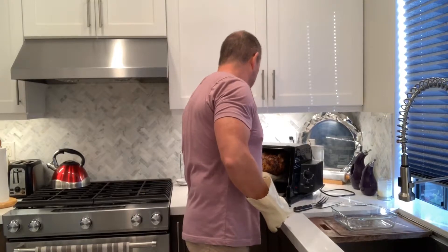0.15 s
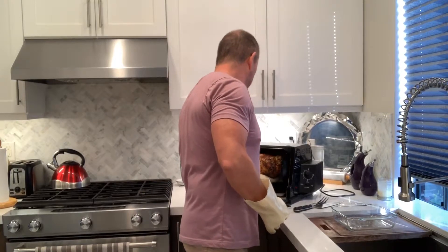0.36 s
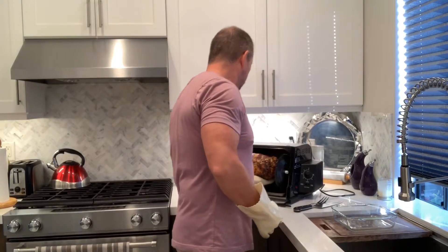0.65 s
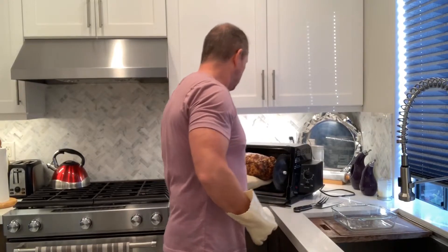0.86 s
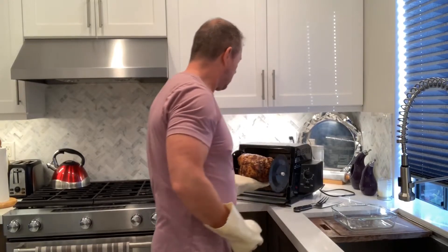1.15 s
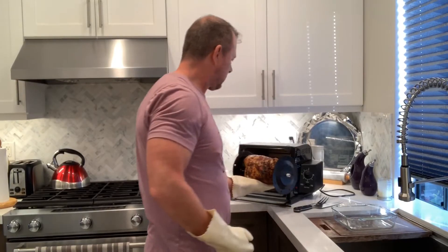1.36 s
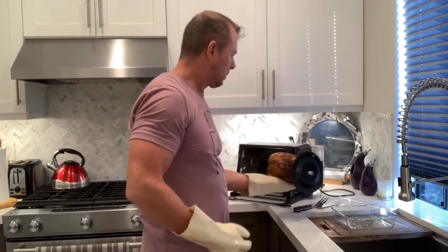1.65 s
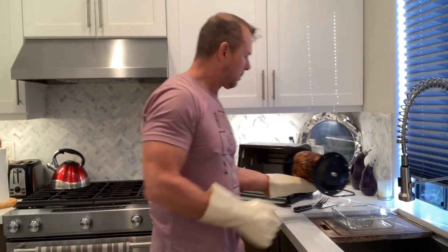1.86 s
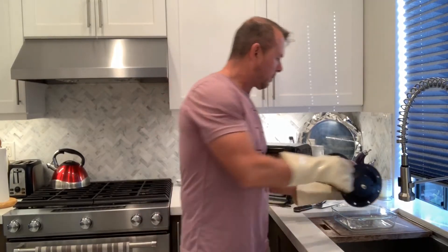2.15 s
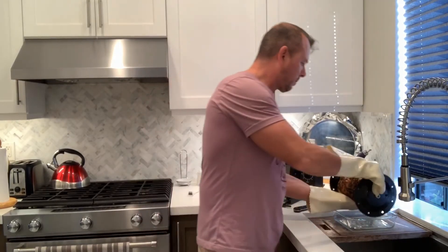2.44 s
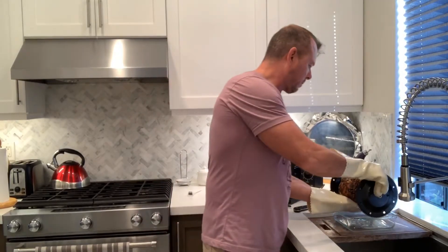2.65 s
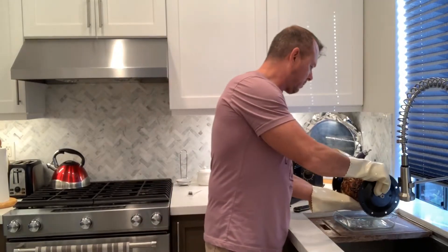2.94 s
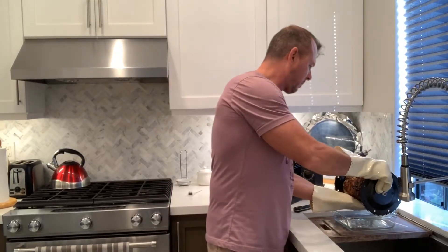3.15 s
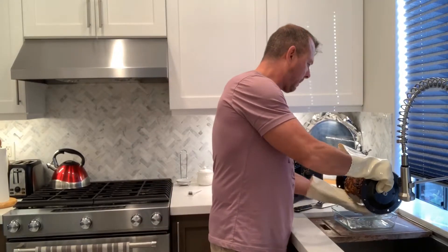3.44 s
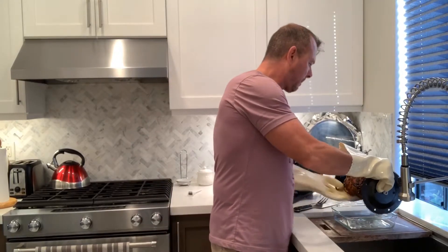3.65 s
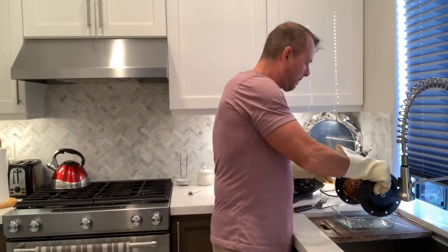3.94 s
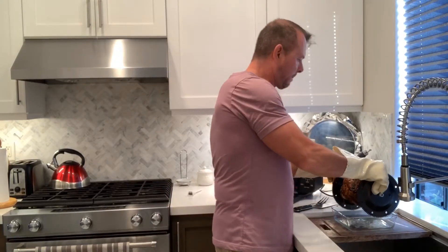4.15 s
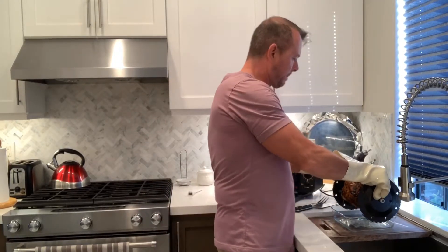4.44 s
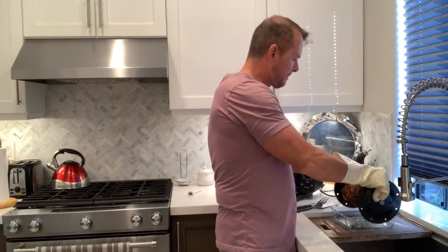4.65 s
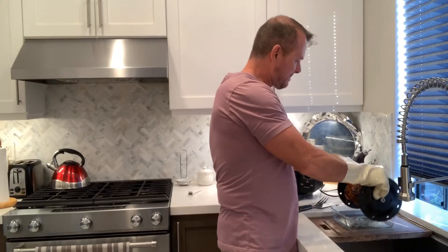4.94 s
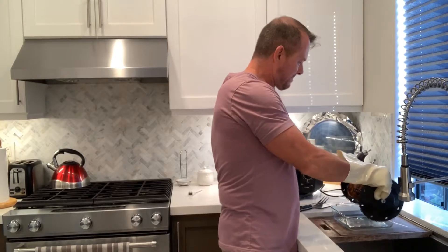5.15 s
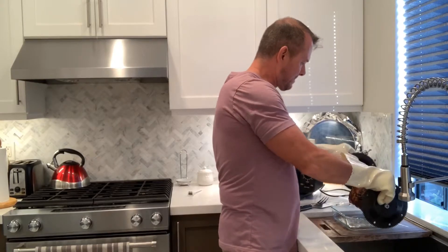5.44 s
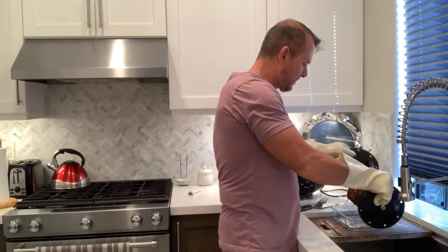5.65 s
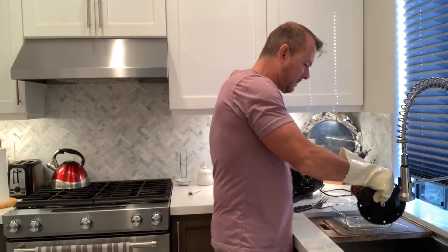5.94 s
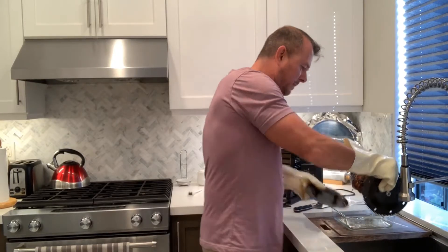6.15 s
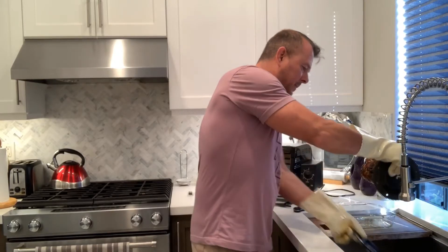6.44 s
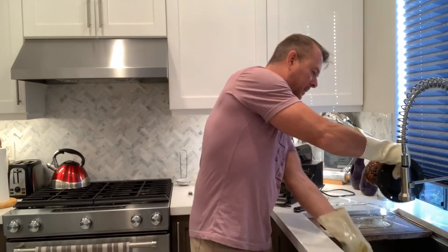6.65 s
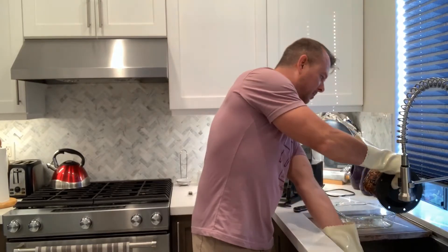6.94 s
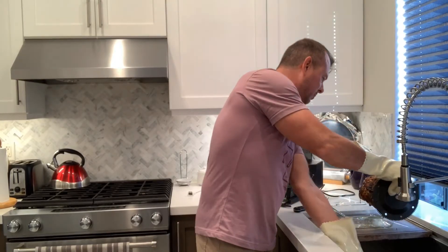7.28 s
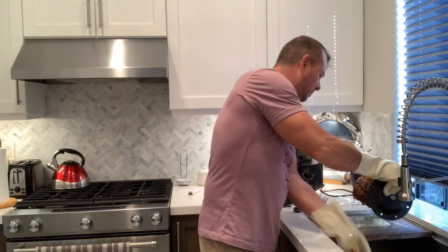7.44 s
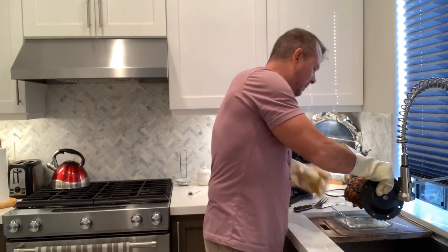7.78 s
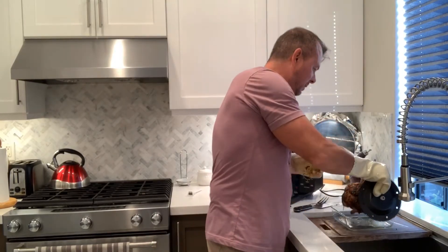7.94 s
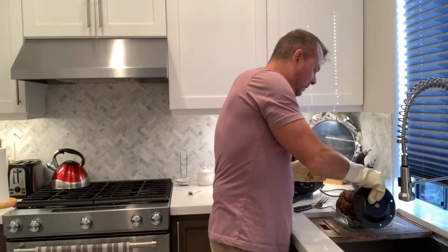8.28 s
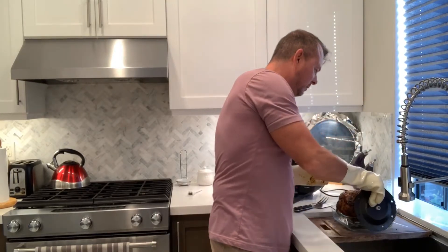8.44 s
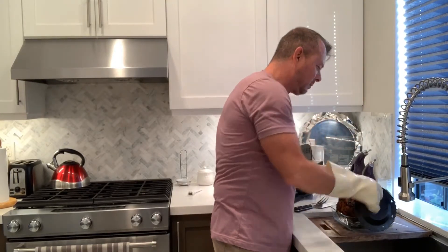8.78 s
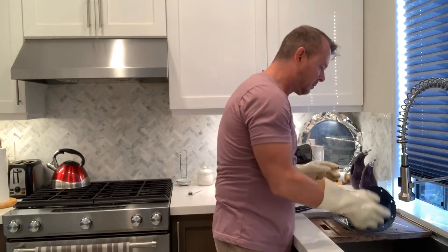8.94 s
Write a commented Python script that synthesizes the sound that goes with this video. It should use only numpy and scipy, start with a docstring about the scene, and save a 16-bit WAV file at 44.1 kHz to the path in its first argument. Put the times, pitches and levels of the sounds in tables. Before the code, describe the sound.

Gloved rustles and thumps, bright ringing metal clanks, a swelling sizzle with crackles, a rumbling drawer, and small clinks in a hard kitchen.

```python
"""Close by, gloves rustle and softly thump a loaded rotisserie spit; a bracket tap and faint squeals follow.
The spit slides out of a countertop oven in a hard-walled kitchen, its steel rod and wheel ends clanking.
Hot metal sizzles over a wet dish, a drawer knocks and rolls, a utensil clinks, and the spit is set down.
Short pushes excite fluttering modes; random grains, shaped by spectra, make the cloth, sizzle and rollers."""
import sys
import numpy as np
from scipy import signal
from scipy.fft import rfft, irfft, next_fast_len
from scipy.io import wavfile

SR = 44100
rng = np.random.default_rng(int(sys.argv[2]) if len(sys.argv) > 2 else 0)


def generate_wav(signal):
    """Clip the signal to [-1, 1] and save it as 16-bit WAV at the path in sys.argv[1]."""
    frames = np.transpose(np.atleast_2d(signal))
    scaled = np.clip(frames, -1, 1) * 32767
    pcm = np.round(scaled).astype(np.int16)
    wavfile.write(sys.argv[1], SR, pcm)


N = 401751
T = np.arange(N) / SR

# centres of a contact's four registers, thud, clank, edge and tick: f/Hz
REGISTER_HZ = [150, 850, 3400, 10000]


def from_db(db):
    """Amplitude of a level in dB."""
    return 10 ** (np.asarray(db) / 20)


def rms_one(x):
    """Scale a sound to rms 1."""
    return x / np.sqrt(np.mean(x ** 2) + 1e-20)


def at_hz(points, hz):
    """Read a curve between its points along log frequency."""
    curve_hz, values = np.array(points).T
    return np.interp(np.log(hz + 1e-3), np.log(curve_hz), values)


def add(out, s, sound):
    """Mix a sound in at s seconds, cut at the end of the scene."""
    start = round(s * SR)
    out[start:start + len(sound)] += sound[:N - start]


def band(x, low, high, order=2):
    """Keep what lies between two frequencies in Hz."""
    return signal.sosfilt(signal.butter(order, [low, high], "band", fs=SR, output="sos"), x)


def high_pass(x, hz):
    """Gentle first-order cut of everything below hz."""
    return signal.sosfilt(signal.butter(1, hz, "high", fs=SR, output="sos"), x)


def colour(x, spectrum):
    """Shape a steady sound by a spectrum; rms 1."""
    size = next_fast_len(N)
    gain = from_db(at_hz(spectrum, np.fft.rfftfreq(size, 1 / SR)))
    return rms_one(irfft(rfft(x, size) * gain, size)[:N])


def drift(rate):
    """Slow chance with a spread near 1: straight lines between rate random values a second."""
    knots = rng.standard_normal(4000)
    return np.interp(T * rate, np.arange(len(knots)), knots)


def grains(per_s, spread_db):
    """Random tiny clicks of uneven size and either sign."""
    sizes = from_db(spread_db * np.minimum(rng.exponential(1, N), 5))
    signs = rng.choice([-1, 1], N)
    return sizes * signs * (rng.random(N) < per_s / SR)


def swells(rows, rest_db=-120):
    """Gain of smooth bell-shaped swells over a resting level; their powers add."""
    power = sum(from_db(db) ** 2 * np.exp(-(2 * (T - s) / length) ** 2) for s, length, db in rows)
    return np.sqrt(power + from_db(rest_db) ** 2)


def kitchen(direct=0.08, build_s=0.0058):
    """Response of the room: a direct path, then dense reflections whose decay depends on frequency."""
    # kitchen reverberation: f/Hz, t60/s
    room_t60 = [(100, 0.5), (250, 0.4), (600, 0.39), (1500, 0.45), (3500, 0.36), (7000, 0.42),
                (14000, 0.22)]
    t, out = T[:SR], np.zeros(SR)
    edges = np.geomspace(50, 18000, 18)
    for low, high in zip(edges, edges[1:]):
        noise = band(rng.standard_normal(2 * SR), low, high, order=3)[SR:]
        decay = from_db(-60 * t / at_hz(room_t60, np.sqrt(low * high)))
        tail = noise * decay * (1 - np.exp(-t / build_s))
        # energy in proportion to bandwidth, so that no register is favoured
        out += tail * np.sqrt(2 * (high - low) / SR / np.sum(tail ** 2))
    out[0] += direct
    return out


def through(x, room):
    """Hear a sound by way of a response."""
    return signal.oaconvolve(x, room)[:N]


def sheet_metal(room, t60, share, count=220):
    """Pressed steel has a thicket of weak high modes; they colour the room's response to a knock."""
    modes = np.zeros(len(room))
    for hz in rng.uniform(1500, 14000, count):
        add(modes, 0, ring(hz, t60, flutter=0.22))
    softened = room - (1 - np.sqrt(1 - share)) * high_pass(room, 2000)
    return softened + modes * np.sqrt(0.35 * share / np.sum(modes ** 2))


def registers(thud_db, clank_db, slope_db):
    """Levels of thud, clank, edge and tick: a slope per octave above the clank, bent down ever faster."""
    bend_db = 0.91   # loss per octave squared: no contact is perfectly sharp
    octaves = np.log2(np.array(REGISTER_HZ[1:]) / REGISTER_HZ[1])
    return [thud_db, *(clank_db + slope_db * octaves - bend_db * octaves ** 2)]


def contact(levels_db, spread_s=0.022):
    """A short push in four registers, scaled for the level it has once the room has spread it out."""
    # band edges of thud, clank, edge and tick: low f/Hz, high f/Hz
    register_edges = [(78, 259), (450, 1425), (1900, 4920), (6800, 13000)]
    click, out = signal.unit_impulse(4096), 0
    for db, (low, high) in zip(levels_db, register_edges):
        pulse = band(click, low, high, order=3)
        out = out + from_db(db) * pulse * np.sqrt(spread_s * SR / np.sum(pulse ** 2))
    return out


def ring(hz, t60, flutter=1.0, flutter_per_s=55.1, rise_s=0.0023):
    """A dying mode, near rms 1 at the start; reflections make its height and phase flutter."""
    t = T[:int(1.2 * t60 * SR)]
    knots = np.arange(200) / flutter_per_s
    height = flutter * np.interp(t, knots, rng.standard_normal(len(knots)))
    phase = flutter * np.interp(t, knots, rng.standard_normal(len(knots)))
    wave = (1 + height) * np.sin(2 * np.pi * (hz * t + rng.random()) + phase)
    return np.sqrt(2) * wave * from_db(-60 * t / t60) * (1 - np.exp(-t / rise_s))


def room_air():
    """Still room noise at the microphone: random noise shaped by one fixed spectrum."""
    # spectrum of the room noise: f/Hz, level/dB per Hz
    air_spectrum = [(12, -35), (20, 0), (60, 5), (81, -24.5), (228, -25.5), (248, -13), (388, -27.5),
                    (422, -20), (459, -26), (624, -27.5), (1370, -24), (1610, -24), (2460, -27.5),
                    (11400, -35), (16000, -42)]
    return from_db(-55) * colour(rng.standard_normal(N), air_spectrum)


def handling(room):
    """Close to the microphone gloves rub and the body shifts, as swelling grains; sliding steel squeals."""
    # strokes of the gloves over steel and food: middle t/s, length/s, level/dB
    glove_strokes = [(.38, 0.23, -61), (.64, 0.055, -60.5), (.94, 0.057, -52), (1.25, 0.97, -64.5),
                     (1.799, .008, -47.5), (1.86, 0.02, -47.5), (1.95, .07, -59.5), (2.25, 0.25, -65),
                     (3.75, .08, -66), (8.48, 0.033, -53), (8.61, 0.036, -61), (8.76, 0.077, -51.5),
                     (8.97, 0.096, -52.5), (9.11, 0.048, -59)]
    # shifts of the body's weight: middle t/s, length/s, level/dB
    weight_shifts = [(.3, 0.89, -53.5), (1.0, 0.34, -55), (2.7, 0.36, -58), (4.7, 0.32, -61),
                     (9.0, .2, -58)]
    # spectrum of the gloves: f/Hz, level/dB per Hz
    cloth_spectrum = [(290, -38.5), (500, -8), (604, -7.5), (831, -2), (1160, -3), (7530, -10.5),
                      (9090, -12), (16000, -18)]
    # spectrum of the body's movement: f/Hz, level/dB per Hz
    body_spectrum = [(47, -22), (80, 1), (229, -9), (301, -18), (401, -9.5), (444, -14), (756, -12),
                     (2500, -33), (3250, -59), (5500, -120)]
    grip_db = -70.5   # the gloves never lie quite still
    shuffle_db = -61   # low stir of body and hands between the shifts
    cloth = colour(grains(per_s=2500, spread_db=5.0), cloth_spectrum)
    rub = swells(glove_strokes, grip_db) * from_db(1.27 * drift(30)) * cloth
    body = colour(grains(per_s=600, spread_db=4.0), body_spectrum)
    shuffle = swells(weight_shifts, shuffle_db) * from_db(0.73 * drift(35)) * body
    return through(rub + shuffle, room) + squeals()


def spit(room):
    """Gloved thumps only knock; steel blows also ring rod and wheel, by their hardness and place."""
    # the loaded spit against the padded gloves: t/s, thud level/dB
    glove_thumps = [(0.256, -43), (0.929, -40), (1.898, -48.5), (2.995, -48.5), (4.358, -38), (4.425, -39),
                    (4.692, -46), (4.969, -29.5), (5.153, -27.5), (8.385, -45.5)]
    # steel strikes steel: t/s, thud level/dB, clank level/dB, treble slope/dB per octave,
    # wheel ring level/dB re knock, place (0 rim - 1 hub), rod ring level/dB
    steel_blows = [(2.404, -19, -16, -2.5, 1, 0, -35), (2.556, -22.5, -18.5, -6.5, -4, 0.92, -40),
                   (2.587, -33, -40.5, 0.5, -4, 0.25, -48), (2.835, -54, -52.5, -5, -9.5, 0.68, -56.5),
                   (3.186, -39, -35, -8.5, 5, 0.56, -52), (3.258, -68, -54.5, -1.5, -8, 0.04, -70),
                   (4.03, -39, -47.5, -2.5, 1.5, 0.42, -41.5), (4.271, -33, -37.5, -14, -10, .5, -68),
                   (4.900, -45, -51.5, -2, 1, .5, -45), (5.000, -14, -15.5, 0, -2, 0.87, -18.5),
                   (5.013, -25, -31, 3.5, -7, 0.82, -28), (5.036, -24, -34, -0.5, -2, 1, -56.5)]
    # wheel modes: f/Hz, t60/s, level/dB struck at the rim, level/dB struck at the hub
    wheel_modes = [(180, 0.36, -21.5, -7), (227, 0.63, -9.5, -16.5), (505.4, 0.43, -26, -6.5),
                   (816, 0.3, -21.5, -3.5), (885, 0.43, -12.5, -6.5), (1137, 0.3, -3.5, -37),
                   (1280, 0.48, -10.5, -6), (1380, 0.45, -10, -2.5), (1433, 0.27, -8.5, -19),
                   (2026, 0.51, -3, -9), (2260, 0.41, -1.5, -9.5), (2357, .35, -4.5, -13),
                   (3019, .42, 0, -11.5), (3043, 0.47, -7, -20.5), (3730, 0.52, -13, -15),
                   (4246, 0.5, -4, -19), (4360, 0.49, -12.5, -31), (4780, 0.44, -4, -3),
                   (5220, 0.35, -8.5, -3.5), (5222, 0.36, -8, 0.5), (5470, 0.47, -7.5, -8),
                   (5395, 0.53, -3, -34), (6150, 0.27, -14.5, 0), (6240, 0.48, -6.5, -12),
                   (6900, 0.39, -16, -7.5), (7360, .45, -12.5, -8.5), (7900, .4, -8.5, -25),
                   (8430, 0.2, -15.5, 1), (9150, 0.29, -6, -10.5), (10200, 0.26, -10.5, -3.5)]
    rod_hz, rod_t60_s = 951, 0.66
    thump_clank_db, thump_slope_db = -13.5, -2.5   # clank re thud; treble slope per octave
    knocks, rings = np.zeros(N), np.zeros(N)
    for s, db in glove_thumps:
        add(knocks, s, contact(registers(db, db + thump_clank_db, thump_slope_db)))
    for s, thud, clank, slope, ring_db, place, rod_db in steel_blows:
        levels = registers(thud, clank, slope)
        add(knocks, s, contact(levels))
        add(rings, s, from_db(rod_db) * ring(rod_hz, rod_t60_s, flutter=0.41))
        for hz, t60, rim_db, hub_db in wheel_modes:
            drive_db = np.interp(np.log(hz), np.log(REGISTER_HZ), levels) + ring_db
            mode_db = drive_db + (1 - place) * rim_db + place * hub_db
            add(rings, s, from_db(mode_db) * ring(hz, t60, flutter=0.91))
    return through(knocks, room) + rings


def taps(room):
    """The bracket lets go of the spit, a utensil clinks, a wheel lands on the dish: each knocks and rings."""
    # in the order bracket, utensil, dish:
    # t/s, thud level/dB, clank level/dB, edge level/dB, tick level/dB, ring level/dB
    tap_rows = [(0.832, -34.5, -32, -36.5, -52, -37), (8.053, -40, -45.5, -34.5, -50.5, -33.5),
                (8.163, -35, -32.5, -37, -50.5, -28.5)]
    # the oven's bracket: f/Hz, level/dB re ring, t60/s
    bracket_modes = [(240, -2.5, 0.39), (705, -2, 0.35), (777, -1, 0.43), (1490, -15, .3), (2100, -8, 0.3),
                     (2580, -9, .4), (2660, -4, 0.24), (2690, -11, 0.36), (3760, -8.5, 0.36),
                     (3790, -16, .4), (4330, -19, 0.26), (5380, -16, 0.41), (7343, -27, .25)]
    # the utensil: f/Hz, level/dB re ring, t60/s before the 0.6 s limit below
    utensil_modes = [(2390, -4, 0.81), (2570, -7, 0.19), (2800, -13, 0.66), (3080, -9, 0.28),
                     (3354, -2.5, 0.18), (3591, -5, 0.38), (4215, -15, .3), (4727, -21, .35),
                     (5170, -8.5, 0.64), (5300, -7, .2), (5530, -10, 0.41), (5920, -7, 0.31),
                     (7700, -17, 0.23), (9000, -26.5, 0.25)]
    # the dish: f/Hz, level/dB re ring, t60/s
    dish_modes = [(952, -7.5, 0.4), (1016, 0.5, 0.16), (1067, -9.5, 0.52), (1330, -13, 0.41),
                  (1850, -12.5, 0.49), (2044, -6.5, 0.43), (2400, -8.5, 0.32), (4820, -16, 0.34),
                  (5260, -23, .22), (5450, -14.5, 0.42), (6169, -15, 0.29), (8100, -22.5, 0.37)]
    knocks, rings = np.zeros(N), np.zeros(N)
    for (s, *levels, ring_db), modes in zip(tap_rows, [bracket_modes, utensil_modes, dish_modes]):
        add(knocks, s, contact(levels))
        for hz, db, t60 in modes:
            add(rings, s, from_db(ring_db + db) * ring(hz, min(t60, .6), flutter=0.93))
    return through(knocks, room) + rings


def squeals(waver_db=1.0):
    """Sliding steel sings one gliding tone a slide: attack, hold, release, with a wavering level."""
    # wheel on the oven's rail, the rod as it slides, wheel on the dish:
    # start t/s, length/s, f/Hz, glide/Hz per s, level/dB
    slides = [(0.969, .16, 2900, -150, -62.5), (1.158, 0.28, 2896, 15, -66), (2.931, 0.17, 950, -3, -55.5),
              (5.205, .055, 2860, -1500, -41)]
    attack_s, release_s = 0.0076, 0.017
    out = np.zeros(N)
    for s, length, hz, glide, db in slides:
        t = T[:SR]
        envelope = np.minimum(t / attack_s, 1) * np.exp(-np.maximum(t - length, 0) / release_s)
        pitch = hz + glide * np.minimum(t, length)
        tone = np.sin(2 * np.pi * np.cumsum(pitch) / SR)
        add(out, s, np.sqrt(2) * from_db(db) * envelope * tone)
    return out * from_db(waver_db * drift(29.6))


def sizzle(room, narrow_low_hz=3200., narrow_high_hz=4690.0):
    """Thousands of tiny bursts a second, a narrow band of hiss that swells, and a few sharp crackles."""
    # vigour of the sizzle on the hot metal: t/s, level/dB
    vigour = [(4.06, -70), (4.13, -50.5), (4.24, -45), (4.58, -38.5), (4.95, -37), (5.62, -39),
              (6.0, -47.5), (6.92, -45), (7.25, -50), (7.9, -62), (8.4, -61), (9.1, -65)]
    # spectrum of the bursts: f/Hz, level/dB per Hz before the treble shelf
    burst_spectrum = [(410, -51.5), (700, -13.5), (922, -10), (1300, -10), (1460, -9.5), (1710, -7),
                      (3160, -3), (3640, -9.5), (4490, -2.5), (7790, -3.5), (13300, -3.5), (16000, -5.5)]
    # swells of narrow hiss; the last, at 6.92, a brush against the drawer: middle t/s, length/s, level/dB
    hiss_swells = [(5.62, .25, -48.5), (6.15, 0.21, -53), (6.36, 0.081, -48.5), (6.72, .35, -62),
                   (6.92, 0.037, -42)]
    # crackles in the sizzle: t/s, level/dB of the click before its band-pass
    crackles = [(4.302, -12.5), (5.8, -11.5), (6.041, -13), (6.117, -8), (6.121, -5), (6.68, -15.5),
                (6.75, -13.5)]
    treble_db = -5   # shelf on the finest bursts
    narrow_db = -12.5   # narrow hiss between its swells, relative to the sizzle
    level_db = np.interp(T, *np.transpose(vigour))
    bursts = colour(grains(per_s=7600, spread_db=10.0), burst_spectrum)
    shelved = bursts + (from_db(treble_db) - 1) * high_pass(bursts, 6500)
    hiss = shelved * from_db(level_db + 0.45 * drift(25))
    narrow = rms_one(band(rng.standard_normal(N), narrow_low_hz, narrow_high_hz))
    hiss += swells(hiss_swells, level_db + narrow_db) * narrow
    click = band(signal.unit_impulse(256), 3200, 15000)
    for s, db in crackles:
        add(hiss, s, from_db(db) * click)
    return through(hiss, room)


def drawer(room, waver=0.61, knock_ring_db=8.5):
    """Knocks ring the rails; then rollers rattle along them and drone the panels, louder with speed."""
    # drawer knocks: t/s, thud level/dB, clank level/dB, treble slope/dB per octave
    drawer_knocks = [(6.946, -18.5, -24.5, 0), (6.985, -23.5, -24, -0.36), (7.203, -43, -43, 0),
                     (7.397, -35, -31, 1)]
    # it creeps, is pushed hard, then coasts: t/s, share of top speed
    drawer_speed = [(7.19, .02), (7.23, 0.15), (7.385, 0.2), (7.42, 0.71), (7.53, 0.94), (7.59, 0.59),
                    (7.66, 0.44), (7.76, 0.15), (8.11, 0.11), (8.22, 0.0092)]
    # spectrum of the runners: f/Hz, level/dB per Hz
    runner_spectrum = [(41, -40), (70, -14), (129, 0.5), (223, -10), (268, -5.5), (368, -17.5), (517, -9.5),
                       (566, -12), (679, -11), (1370, -15), (2120, -17), (6450, -30), (9490, -32.5),
                       (14600, -35.5), (16000, -47)]
    # runner resonances: f/Hz, level/dB, t60/s while rolling (a knock rings twice as long)
    rail_modes = [(664, -25, .15), (2037, -20, 0.21), (2632, -21.5, 0.17), (3750, -28, 0.28),
                  (5460, -31, 0.21), (6080, -28.5, 0.26), (7380, -23.5, .12), (9260, -27, 0.13),
                  (12200, -36, 0.23)]
    # drawer panel tones: f/Hz, level/dB
    panel_tones = [(101, -7.5), (118, -6.5), (147.5, -3.5), (268, -15.5), (516, -25)]
    rattle_db, rattle_power = -13.5, 2.034   # runners at top speed; they grow as this power of speed
    drone_db, drone_power = -22, 0.84   # the same for the panels
    knocks, rings = np.zeros(N), np.zeros(N)
    for s, *blow in drawer_knocks:
        thud, clank, edge, tick = registers(*blow)
        add(knocks, s, contact([thud, clank, edge, tick]))
        for hz, db, t60 in rail_modes:
            add(rings, s, from_db(edge + db + knock_ring_db) * ring(hz, 2 * t60))
    speed = np.interp(T, *np.transpose(drawer_speed), left=0, right=0)
    bumps = grains(per_s=1100, spread_db=4.5)
    rails = sum(from_db(db) * rms_one(through(bumps, ring(hz, t60))) for hz, db, t60 in rail_modes)
    rattle = from_db(rattle_db) * speed ** rattle_power * (colour(bumps, runner_spectrum) + rails)
    drone = np.zeros(N)
    for hz, db in panel_tones:
        height = 1 + waver * drift(13)
        drone += from_db(db) * height * np.sin(2 * np.pi * hz * T + 0.81 * drift(11))
    drone *= np.sqrt(2) * from_db(drone_db) * speed ** drone_power
    return through(knocks + rattle, room) + rings + drone


def scene():
    """One hard kitchen over still room noise; sizzle and gloves reach the microphone more directly."""
    room = kitchen()
    near = .95 * kitchen(direct=.3, build_s=.0005)
    steel = sheet_metal(room, t60=0.28, share=0.35)
    runners = sheet_metal(kitchen(), t60=0.15, share=0.28)
    hands = room_air() + handling(near)
    metal = spit(steel) + taps(steel)
    return (hands + metal + sizzle(near) + drawer(runners))[None]


def record(dry):
    """At the microphone the loudest peaks are rounded towards full scale and the top is cut."""
    low_pass = signal.ellip(12, .1, 90, 15850, fs=SR, output="sos")   # cutoff in Hz
    return signal.sosfilt(low_pass, np.tanh(dry))


dry = scene()
out = record(dry)
generate_wav(out)
```